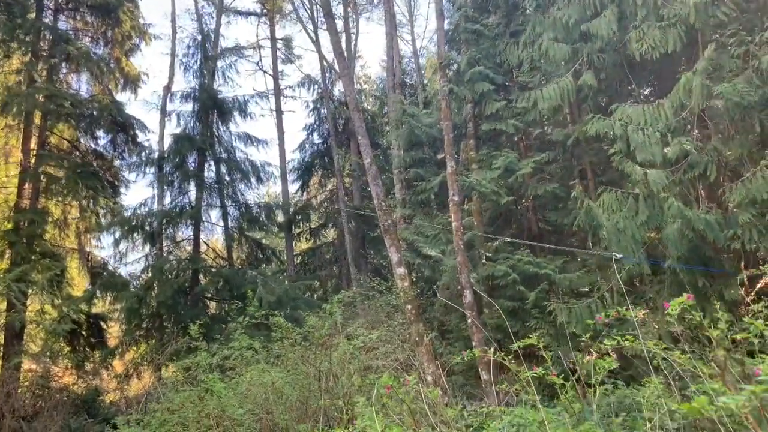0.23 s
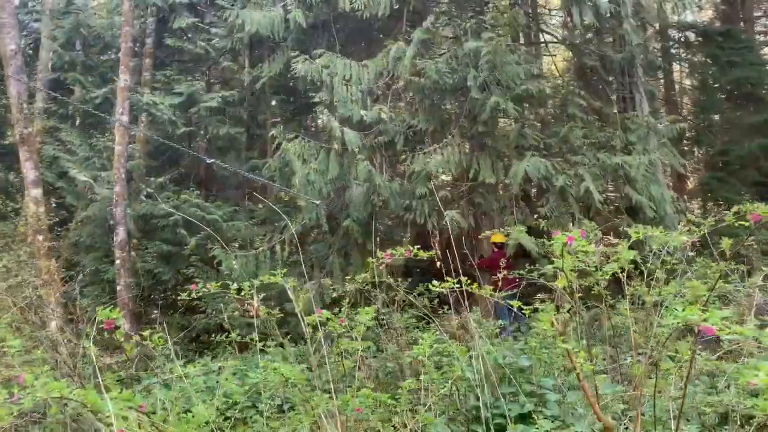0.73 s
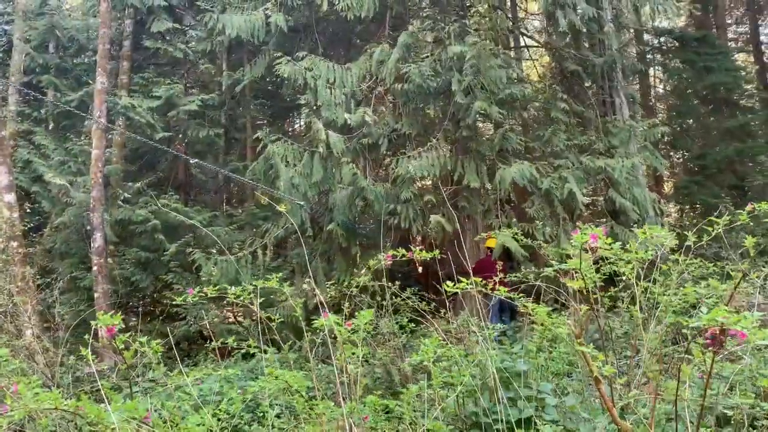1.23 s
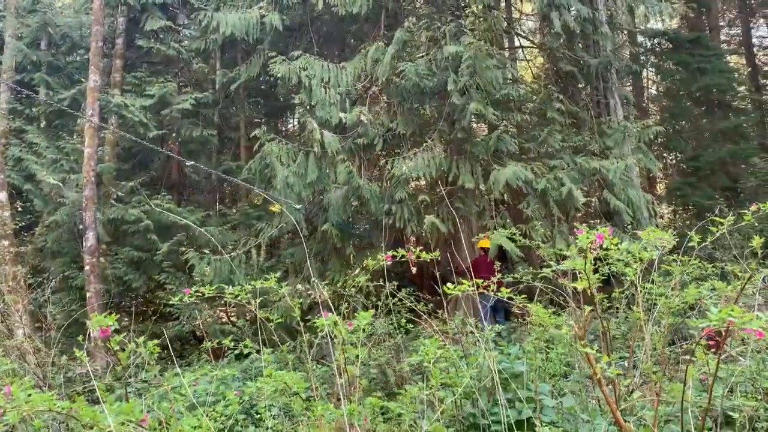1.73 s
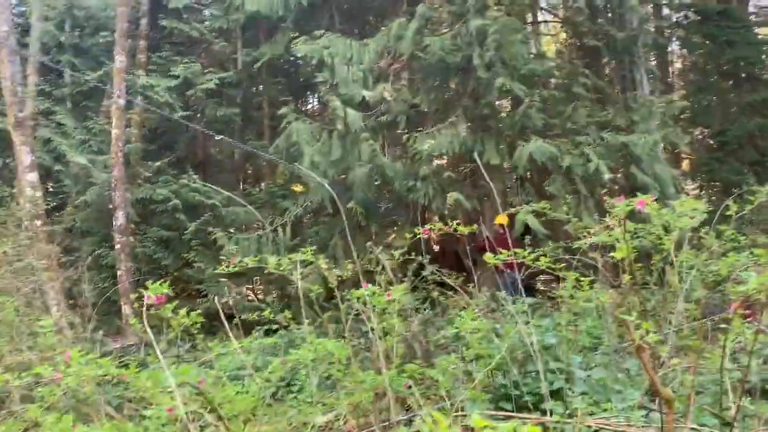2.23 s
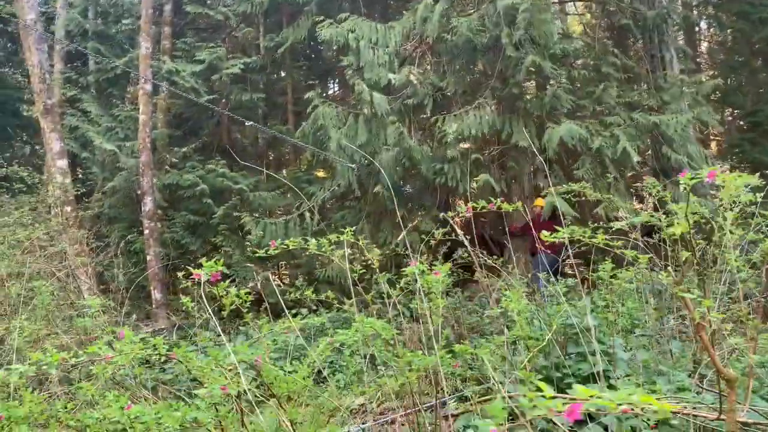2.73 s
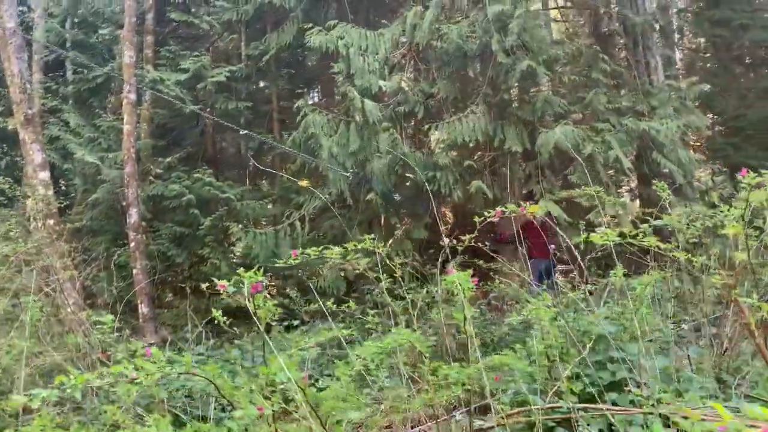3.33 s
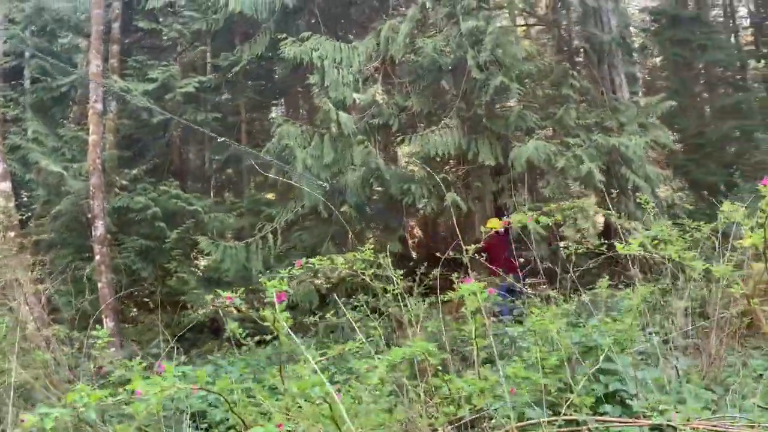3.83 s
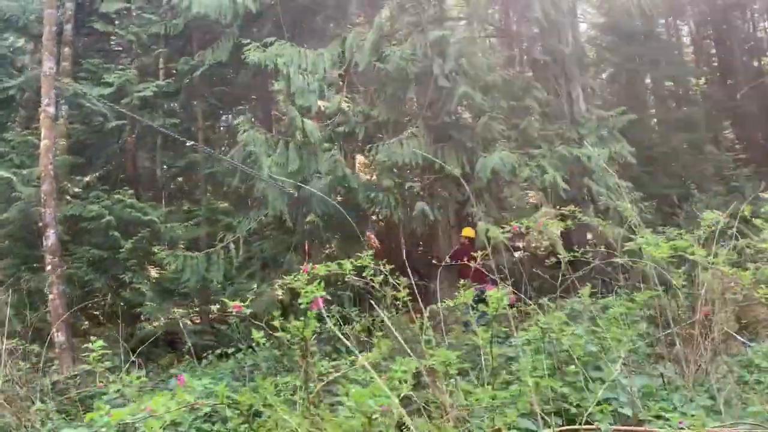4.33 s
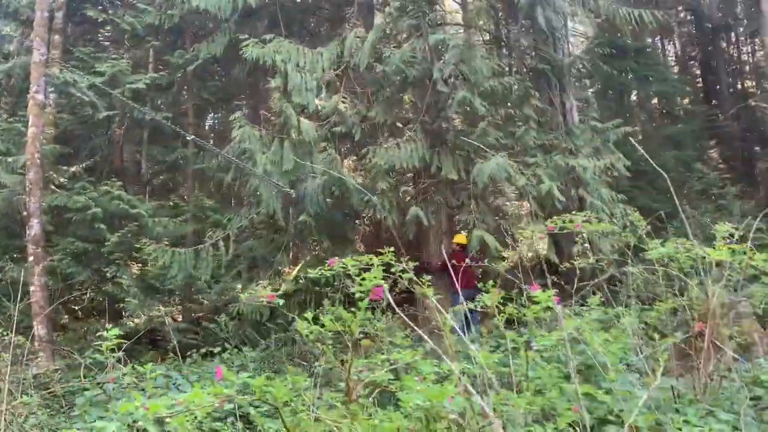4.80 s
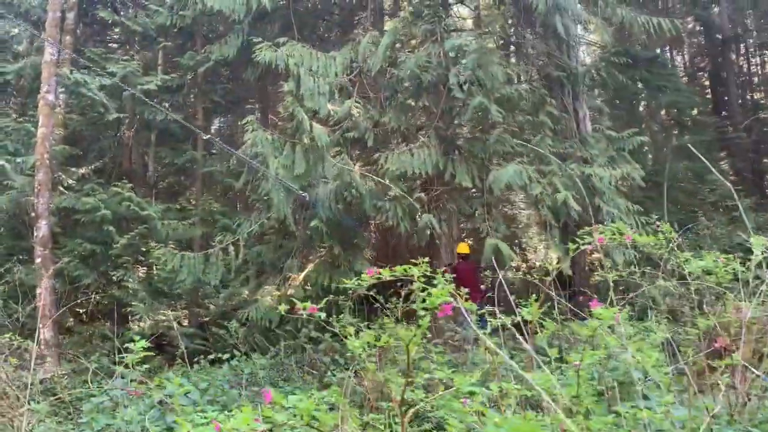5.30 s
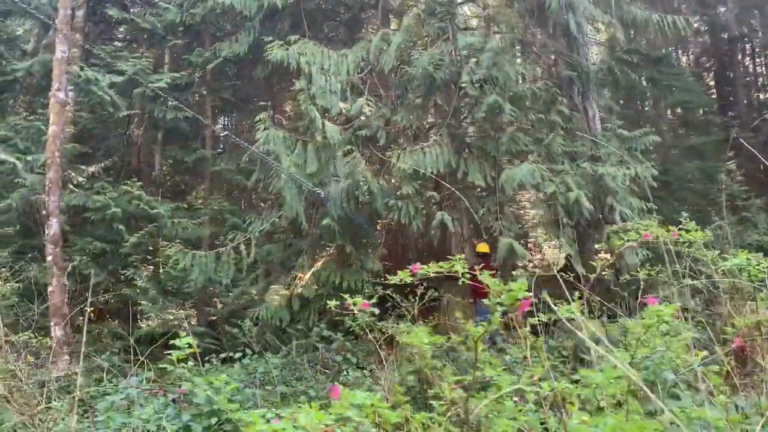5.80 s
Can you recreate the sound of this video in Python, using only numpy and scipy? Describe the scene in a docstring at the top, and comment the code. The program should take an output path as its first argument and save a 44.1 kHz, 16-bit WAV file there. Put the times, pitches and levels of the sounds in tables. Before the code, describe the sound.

A lever winch ratchets in a forest, sharp paired steel clacks repeating at an even pace, echoing off trunks over faint air and microphone rumble.

```python
"""Hand winch among trees

A lever winch ratchets: pairs of steel pawl drops, noise bursts through resonators, ring and echo off the trunks.
Small knocks are softer bursts; a swish of leaves or rope is patchy, crackling noise. Under them lie forest air
and hiss of shaped noise, the low noise rumble of a hand-held microphone, and its carrier's bumps, low decaying sines."""
import sys
import numpy as np
from scipy import signal
from scipy.fft import rfft, irfft, next_fast_len
from scipy.io import wavfile
from scipy.ndimage import uniform_filter1d, map_coordinates

SR = 44100
rng = np.random.default_rng(int(sys.argv[2]) if len(sys.argv) > 2 else 0)


def digitize_waveform(pressure):
    """Quantize a signal to 16-bit integers and store it at the path in sys.argv[1].

    Rows of a 2-D input are taken as channels; values are limited to [-1, 1].
    """
    field = np.atleast_2d(pressure).T
    bounded = np.clip(field, -1, 1)
    quanta = np.round(bounded * 32767).astype(np.int16)
    wavfile.write(sys.argv[1], SR, quanta)


N = 267157

# Pawl drops, and at 5.05 s a low knock on the frame. Each row: time in seconds, strike level in dB, then low
# frame, high frame and treble in dB re strike, # crack pitch in Hz, its gain in dB, chatter in ms, loose part
# in dB re strike.
PAWL_DROPS = [(0.367, -26, -1, -39, 4, 4800, 15, 1.3, -60),
              (0.4447, -25.5, -2, -13, 0.5, 2450, 10.4, 1.6, -60),
              (0.5874, -19, -7, -44, -1.3, 2420, 7.2, 2.7, -58),
              (1.1768, -14.5, -12.5, -21, 1, 6760, 8.5, 1.1, -29.5),
              (1.3251, -21, -10, -32, 6.5, 5620, 13, 13, -22.5),
              (1.977, -15.5, -1.3, -16, 5.5, 2350, 6.7, 0.82, -60),
              (2.1169, -18, -1.5, -18, 1.2, 2200, 2.5, 6.3, -33.5),
              (2.7683, -19, -10.5, -15, 5, 5050, 9.2, 6.2, -32),
              (2.9372, -22, -14.5, -24.5, 5, 5635, 9.5, 13, -25),
              (3.5411, -16.5, 1.5, -8, 3, 4580, 5.1, 0.72, -57),
              (3.686, -17, -1.5, -10, 4.5, 4510, 8, 2.1, -61.5),
              (4.3201, -20, -3.5, -17.5, 7.5, 6840, 12, 7.7, -22.5),
              (4.4674, -20, -11.5, -19, 3, 5950, 9.5, 7.1, -23.5),
              (5.0546, -24.5, -0.6, 0.3, -2, 7390, 14, 3.7, -55),
              (5.1221, -16, -2.5, -10.5, 4, 5270, 4, 6.7, -54),
              (5.2697, -18, -1, -6.5, 6, 4600, 2, 1.33, -60),
              (5.8626, -18, -6, -12.5, 7, 5680, 10.5, 2.2, -60),
              (6.0246, -19, -27, -18, 3, 5930, 14, 6.1, -60)]
# Small ticks and knocks of lever and twigs. Each row: time in seconds, strike level in dB, then low frame,
# high frame and treble in dB re strike, pitch in Hz, its gain in dB, chatter in ms.
TICKS = [(0.0149, -43.5, 15.7, 7.5, -30, 1390, 22.4, 3.2), (0.259, -39.5, 7.4, -1.5, 9.7, 4670, 14.3, 1.1),
         (0.9189, -57, 20.6, 9.5, -11.5, 1690, 29.5, 4.9), (0.9535, -51, 1.5, -12, -6.5, 2110, 9.6, 6.6),
         (0.9934, -50, 3.5, 7, -4.5, 1530, 27, 9.3), (1.5008, -48.5, 7.1, 5, -0.6, 2106, 15, 7.4),
         (1.5121, -43, 7.8, -5, 4.5, 2600, 19, 3.6), (1.7, -46, 22, 6, -11.5, 2150, 22.3, 5),
         (2.4336, -64.5, 26.4, 7, -12.5, 2690, 22.6, 7.9), (2.4726, -65.5, 19, 5, -15.5, 2790, 21, 5.8),
         (2.4947, -70.5, 30, 2, -11, 2140, 30, 6), (2.8486, -55, 7.5, 7, -8, 1350, 33, 3.1),
         (3.133, -55, 21, -20.5, -7.5, 1850, 26.3, 2.4), (3.261, -33.5, 9, -6, -5, 2075, 8, 1.45),
         (3.333, -69.5, 8, -4, -25, 2340, 24, 7.1), (3.511, -55.5, 5, -3, -15, 1400, 22, 4),
         (3.8106, -52, 18, 7.5, -20.5, 1300, 26, 4.1), (4.0, -64, 4, 3, -23, 1430, 24, 9),
         (4.0464, -58.5, 5.5, 12.5, -16.5, 2750, 19, 7.5), (4.076, -62, 4, 8, -18, 1100, 21, 5),
         (4.1166, -54, 21.3, 10.5, 9.5, 1690, 33, 7.6), (4.826, -46, 5, -4, -9, 2250, 5, 3.2),
         (4.835, -34.5, 11, -2, -32, 2250, 3.9, 1.8), (4.9616, -72, 20, -5.5, -22, 2390, 32, 6),
         (5.231, -40.5, 26.4, 18.5, -13, 1450, 26.4, 8.3), (5.5483, -51, 15.7, 9, -17, 2050, 13.7, 2.7),
         (5.6225, -55.5, 17.4, 14.5, -2, 2080, 22, 3.9)]
# Bumps on the microphone. Each row: start in seconds, swing level in dB, pitch in Hz, t60 in seconds,
# thud in dB re swing before a common lift.
BUMPS = [(0.026, -43, 76.4, 0.053, 5), (0.374, -39, 55, 0.2, -20), (0.611, -27.5, 77, 0.11, -12),
         (1.689, -39.5, 67, 0.21, 0), (1.839, -42.5, 72, 0.11, -13), (2.11, -22, 55.4, 0.14, -30.5),
         (2.238, -39, 71.5, 0.18, -30), (3.261, -38, 108, 0.13, 1.5), (4.064, -31, 57.7, 0.25, -18),
         (4.173, -19.5, 51.5, 0.054, -21.5), (4.289, -21.5, 64.3, 0.11, -25.5),
         (4.562, -37.5, 57.3, 0.19, -31.5), (4.842, -37.5, 112, 0.12, 3), (5.752, -27, 51.1, 0.087, -15.5)]
# Steel of pawl and wheel, damped by the rope. Each row: pitch in Hz, relative level in dB, t60 in seconds.
STEEL_MODES = [(2410, -18.5, 0.14), (3303, -17.5, 1), (4010, -15, 0.36), (4820, -18.5, 0.6),
               (5560, -12, 0.56), (6130, -17, 0.55), (6900, -9.5, 0.35), (8610, 10.5, 0.17),
               (12500, -6, 0.074), (13200, -21.5, 0.14), (16200, -7.5, .14)]
# Loose part of the winch: pitch in Hz, t60 in seconds.
LOOSE_MODE = (11172, 0.35)
# Winch frame, low and high resonances. Each row: pitch in Hz, width in Hz, gain in dB.
LOW_FRAME = [(360.3, 180, 0.5), (479, 217, 2.46)]
HIGH_FRAME = [(984, 150, 4.7), (1126, 140, 4.8)]
# Resonances shared by all pawl drops, and by all ticks. Each row: pitch in Hz, mean gain in dB.
PAWL_MODES = [(2330, 2), (2780, 2.4), (4080, 5), (4790, 6.2), (5900, 1.7), (6905, 4.9)]
TICK_MODES = [(3700, 11)]
# Colour of a contact. Each row: frequency in Hz, gain in dB.
SNAP_COLOUR = [(300, -25.5), (1200, -18.5), (2400, -11), (3200, -14.5), (4100, -11.5), (5500, -15),
               (7000, -11), (8800, 0.5), (10500, -16), (12500, -11.5), (14300, -15), (15600, -4),
               (16500, -35.5)]
# Colours of forest air, microphone hiss, rumble and rubbing. Each row: frequency in Hz, relative dB per Hz.
AIR_COLOUR = [(150, -0.5), (300, 1.5), (700, -8), (1200, -10.5), (2000, -15), (3000, -19.5), (4500, -26.5),
              (8000, -64.5)]
HISS_COLOUR = [(1000, -7), (3000, -5), (6000, 3.5), (9000, 3), (12500, -1.5), (15600, -2), (16200, -30)]
RUMBLE_COLOUR = [(15, -42), (30, 4.5), (52, 9.5), (80, 5.5), (130, -7), (220, -28), (400, -69)]
RUB_COLOUR = [(300, 0.5), (1200, 1), (2000, -2.5), (4200, -0.5), (6000, -9), (8300, 0), (10500, -6),
              (14300, -7), (15600, -5.5), (16500, -42.5)]
# Faders of air (before the echo wash), hiss, rumble (before gusts) and swish.
# Each row: time in seconds, level in dB.
AIR_LEVEL = [(0, -62), (.5, -67.5), (.9, -74), (1.64, -65), (2.6, -71), (3.2, -68.5), (3.6, -74.5),
             (4.12, -62), (4.25, -67), (4.88, -71), (5.3, -63.5), (6.06, -70.5)]
HISS_LEVEL = [(0, -79.5), (.4, -73.5), (.75, -80.5), (3, -85.5), (6.06, -81)]
RUMBLE_LEVEL = [(0, -47.5), (.27, -63.5), (.5, -52), (.79, -66.5), (1.18, -61), (1.84, -61), (2.16, -52.5),
                (2.41, -62), (2.87, -62.5), (3.39, -55.5), (3.63, -61), (4.1, -58.5), (4.23, -45.5),
                (4.5, -58.5), (4.91, -59), (5.5, -62), (5.79, -43.5), (6.06, -58.5)]
SWISH_LEVEL = [(0.8, -77), (0.866, -66), (1.002, -49), (1.17, -57.5)]
# Echo off the trunks. Each row: frequency in Hz, t60 in seconds.
TRUNK_T60 = [(300, 0.22), (1200, 0.38), (3000, 1), (7000, 0.46), (11000, 0.26), (14000, 0.093),
             (16000, 0.14)]
# Diffuse sound at the two ports. Each row: frequency in Hz, left-right likeness (1 is identical).
ALIKE = [(60, 0.96), (150, 0.92), (400, 0.17), (1200, 0.34), (3000, 0.12), (6800, 0.11), (8300, 1),
         (16000, 0.57)]
# Sideways balance of the direct winch. Each row: frequency in Hz, left minus right in dB.
SIDEWAYS = [(300, 0), (1000, -3), (1500, 0.5), (3300, -3.5), (4500, -1.5), (5400, -12.5), (6200, -4.5),
            (8000, 3), (16000, -2.5)]
# Lead of the right port below the treble. Each row: frequency in Hz, phase in radians.
PORT_LEAD = [(0, 1), (150, -0.37), (400, 0.3), (1500, 0.55), (2500, 0.4), (3400, -2), (4200, 0.3),
             (5000, 2.5), (5400, -1.4), (5900, -1.9)]

WASH_DB, WASH_T60_S = -41, 0.76  # level of the low echo wash re each pawl's strike level, and its decay
BOUNCE_DB = 3  # spread of a contact's strength from bounce to bounce
IN_STEP_HZ, TURN_HZ = 6150, 4870  # no lead here; above, one turn per TURN_HZ: a fifth of a millisecond
TOP_HZ = 17100  # band limit


def amp(db):
    """Gain from dB."""
    return 10 ** (np.asarray(db) / 20)


def unit(x):
    """Scale to rms 1."""
    return x / np.sqrt(np.mean(x ** 2) + 1e-20)


def along(points, hz):
    """Read (Hz, value) points on a log frequency axis."""
    f, v = np.transpose(points)
    return np.interp(np.log(hz + 1), np.log(f + 1), v)


def level(rows):
    """Gain per sample from (s, dB) rows, silent outside them."""
    s, db = np.transpose(rows)
    return amp(np.interp(np.arange(N) / SR, s, db, left=-150, right=-150))


def wobble(rate):
    """A smooth random curve with rate knots a second."""
    knots = rng.standard_normal(int(N * rate / SR) + 4)
    return map_coordinates(knots, [np.arange(N) * rate / SR])


def filtered(x, response):
    """Multiply the spectrum of x by a complex response of frequency."""
    m = next_fast_len(N + SR // 2)
    return irfft(rfft(x, m) * response(np.fft.rfftfreq(m, 1 / SR)), m)[..., :N]


def causal(db):
    """Minimum-phase response for a gain in dB on the FFT grid, by folding the cepstrum."""
    cepstrum = irfft(np.log(amp(db) + 1e-6))
    half = len(cepstrum) // 2
    cepstrum[1:half] *= 2
    cepstrum[half + 1:] = 0
    return np.exp(rfft(cepstrum))


def resonances(modes):
    """Causal response of (Hz, width, dB) modes, added with alternating sign."""
    def response(f):
        return sum((-1) ** k * amp(g) * 1j * f * width / (hz * hz - f * f + 1j * f * width)
                   for k, (hz, width, g) in enumerate(modes))
    return response


def diffuse(pair, spectrum):
    """Two unrelated signals become a left-right pair of the given colour and likeness."""
    def mid_side(hz):
        turn = np.arccos(np.clip(along(ALIKE, hz), -1, 1)) / 2
        return amp(along(spectrum, hz)) * [np.cos(turn), np.sin(turn)]
    mid, side = filtered(pair, mid_side)
    return np.array([mid + side, mid - side])


def rush(spectrum, grain_db, patchy_db=0):
    """Stereo noise of rms 1 whose level flutters, with time-frequency patches of random gain."""
    z = signal.stft(rng.standard_normal((2, N)), nperseg=256)[2]
    patches = uniform_filter1d(rng.standard_normal(z.shape[1:]), size=6, axis=0)
    patches = unit(uniform_filter1d(patches, size=5, axis=1))
    pair = signal.istft(z * amp(patchy_db * patches), nperseg=256)[1][:, :N]
    return unit(diffuse(pair, spectrum) * amp(grain_db * wobble(150)))


def air():
    """Forest air on a slow level and the microphone's hiss; a long low echo washes after each pawl drop."""
    t = np.arange(N) / SR
    wash = sum(amp(db + WASH_DB - 60 * np.abs(t - s) / WASH_T60_S) * (t > s) for s, db, *_ in PAWL_DROPS)
    forest = np.hypot(level(AIR_LEVEL), wash) * rush(AIR_COLOUR, grain_db=0.0, patchy_db=2.5)
    return forest + level(HISS_LEVEL) * rush(HISS_COLOUR, grain_db=0.6)


def rumble():
    """Low rumble of the hand-held microphone: dark noise on a slow level with random gusts."""
    gusts = amp(2.5 * wobble(9))
    return level(RUMBLE_LEVEL) * gusts * rush(RUMBLE_COLOUR, grain_db=2.5)


def contacts(rows, modes, rise_s, fade_s, rest_db, rest_s, sharp, modes_sharp, slip_s, slip_db):
    """Each contact slips, chatters for some ms, then dies; it snaps in middle and treble and knocks the frame."""
    t = np.arange(SR // 4) / SR
    body, treble, low, high = np.zeros((4, N + SR))
    for s, db, low_db, high_db, treble_db, pitch_hz, pitch_db, ms, *_ in rows:
        after = np.maximum(t - slip_s, 0)
        over = np.maximum(after - ms / 1000, 0)  # time since the chatter ended
        decay = amp(-60 * over / fade_s - 400 * after) + amp(rest_db - 60 * after / rest_s)
        shape = (1 - np.exp(-after / rise_s)) ** 2 * decay
        # a faint scrape as the part slips off its seat
        shape += amp(slip_db) * (t / slip_s) ** 1.4 * (t < slip_s + rise_s)

        # the contact bounces: its strength jumps every half millisecond
        bounce = amp(BOUNCE_DB * rng.standard_normal(len(t) // 24 + 1).repeat(24)[:len(t)])
        burst = shape * rng.standard_normal(len(t)) * bounce
        burst *= np.linalg.norm(shape) / np.linalg.norm(burst)

        ring = amp(pitch_db) * signal.lfilter(*signal.iirpeak(pitch_hz, sharp, SR), burst)
        for hz, g in modes:
            ring += amp(g + rng.normal(0, 2.7)) * signal.lfilter(*signal.iirpeak(hz, modes_sharp, SR), burst)

        first = max(round((s - rise_s - slip_s) * SR), 0)
        at = slice(first, first + len(t))
        body[at] += amp(db) * (burst + ring)
        # the treble dies first
        treble[at] += amp(db + treble_db) * burst * (0.36 + np.exp(-after / 0.0056) * (after > 0))
        low[at] += amp(db + low_db) * burst * (1 - np.exp(-after / 0.0081))  # the frame answers late
        high[at] += amp(db + high_db - 60 * over / 0.18) * burst

    def share(hz):  # crossover from body to treble around 8 kHz
        return 1 / (1 + (8000 / (hz + 1)) ** 8)

    def colour(hz, part):
        return causal(along(SNAP_COLOUR, hz) + 20 * np.log10(part))
    snap = filtered(body[:N], lambda hz: colour(hz, 1.001 - share(hz)))
    snap += filtered(treble[:N], lambda hz: colour(hz, share(hz)))
    return snap + filtered(low[:N], resonances(LOW_FRAME)) + filtered(high[:N], resonances(HIGH_FRAME))


def ticks():
    """Small knocks of lever and twigs: softer contacts with broad resonances."""
    return contacts(TICKS, TICK_MODES, rise_s=0.0014, fade_s=0.074, rest_db=-12, rest_s=0.15,
                    sharp=4.2, modes_sharp=9.5, slip_s=0.0068, slip_db=-24.5)


def bumps():
    """Steps and grip changes shake the microphone: a few low cycles and a short thud each."""
    out, t = np.zeros(N + SR), np.arange(SR // 2) / SR
    thud_hz, thud_t60, thud_lift_db = 170, 0.082, 4.5
    for s, db, hz, t60, thud_db in BUMPS:
        swing = amp(-60 * t / t60) * (1 - np.exp(-t / 0.0058)) * np.sin(2 * np.pi * hz * t)
        thud = amp(thud_db + thud_lift_db - 60 * t / thud_t60) * (1 - np.exp(-t / 0.01)) ** 2
        thud *= np.sin(2 * np.pi * thud_hz * t + rng.uniform(0, 3.7))
        out[round(s * SR):][:len(t)] += amp(db) * (swing + thud)
    return out[:N] * amp([[.3], [-.3]])  # left and right, dB


def pawls():
    """Pawl drops: abrupt, sharply resonant contacts."""
    return contacts(PAWL_DROPS, PAWL_MODES, rise_s=.0004, fade_s=0.042, rest_db=-9.5, rest_s=0.15,
                    sharp=16, modes_sharp=34, slip_s=.008, slip_db=-15)


def steel():
    """Each pawl drop rings damped steel, its modes wavering like beating clusters, and a loose part by its own level."""
    out, t = np.zeros(N + SR), np.arange(SR // 3) / SR
    loose_hz, loose_t60 = LOOSE_MODE
    for s, db, *_, loose_db in PAWL_DROPS:
        beats = rng.standard_normal((2, len(STEEL_MODES), len(t)))
        beats = uniform_filter1d(beats, size=140, axis=2) * np.sqrt(70)
        ring = np.zeros(len(t))
        for (hz, g, t60), a, b in zip(STEEL_MODES, *beats):
            wave = a * np.sin(2 * np.pi * hz * t) + b * np.cos(2 * np.pi * hz * t)
            ring += amp(g - 24.0 + rng.normal(0, 3) - 60 * t / t60) * wave  # new strengths every drop
        loose = amp(loose_db - 60 * t / loose_t60) * (1 - np.exp(-t / 0.003))
        loose *= np.sin(2 * np.pi * loose_hz * t)
        loose *= np.cos(2 * np.pi * rng.uniform(1, 7) * t)  # a close pair beats
        out[round(s * SR):][:len(t)] += amp(db) * (ring * (1 - np.exp(-t / 0.0014)) + loose)
    return out[:N]


def trunks(x):
    """Echoes off the trees: each frequency dies at its own speed; a new tail every third of a second."""
    out, step = np.zeros((2, N + 2 * SR)), SR // 3
    delay = 400  # samples, 9 ms
    for a in range(0, N, step):
        hz, t, z = signal.stft(rng.standard_normal((2, SR)), SR, nperseg=256)
        fade = amp(-60 * t / along(TRUNK_T60, hz)[:, None])
        tail = signal.istft(z * fade, SR, nperseg=256)[1]
        wet = signal.fftconvolve(x[None, a:a + step], tail / np.linalg.norm(tail[0]), axes=1)
        out[:, a + delay:a + delay + wet.shape[1]] += wet
    # echo colour: (Hz, dB)
    return diffuse(out[:, :N], [(200, 1.5), (1000, 1.5), (3000, -8.5), (8000, -9.5), (16000, 7.5)])


def swish():
    """Leaves or rope brushing: patchy noise with sparse crackles riding on it."""
    crackle = amp(5.8 * rng.exponential(size=N // 64 + 1) ** 0.83).clip(0, 9).repeat(64)[:N]
    rub = rush(RUB_COLOUR, grain_db=1.0, patchy_db=2.5)
    return level(SWISH_LEVEL) * unit(rub * (1 + .15 * crackle))


def scene():
    """Mix the winch, placed sideways, and its echoes with the swish, air, rumble and bumps."""
    winch = ticks() + pawls() + steel()
    direct = filtered(winch, lambda hz: amp(along(SIDEWAYS, hz) * np.array([[.5], [-.5]])))
    return air() + rumble() + bumps() + direct + amp(-9.5) * trunks(winch) + swish()


def record(dry):
    """The ports differ in phase; the deep bass is cut; the top edge rolls off, then nothing passes above the limit."""
    def response(hz):
        below = np.interp(hz, *np.transpose([*PORT_LEAD, (IN_STEP_HZ, 0)]))
        lead = np.where(hz < IN_STEP_HZ, below, 2 * np.pi * (hz - IN_STEP_HZ) / TURN_HZ)
        bass_cut = (1j * hz / (38 + 1j * hz)) ** 2
        edge = amp(np.interp(hz, [15800, 16100, 17000], [0, -12, -35]))
        return np.exp(1j * lead * np.array([[-.5], [.5]])) * edge * bass_cut * (hz < TOP_HZ)
    return filtered(dry, response)


dry = scene()
out = record(dry)
digitize_waveform(out)
```